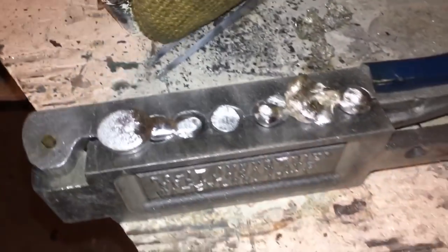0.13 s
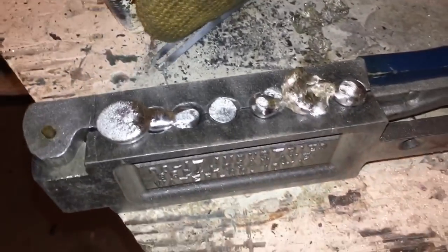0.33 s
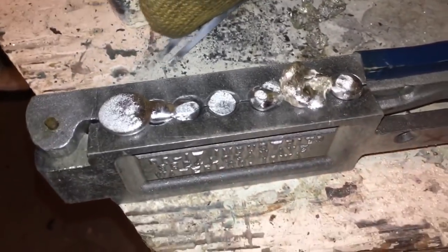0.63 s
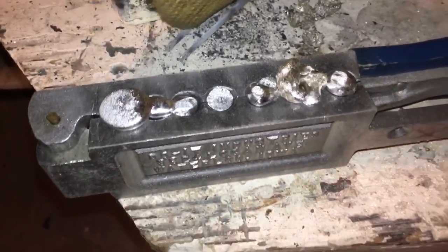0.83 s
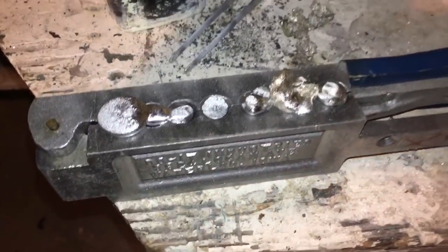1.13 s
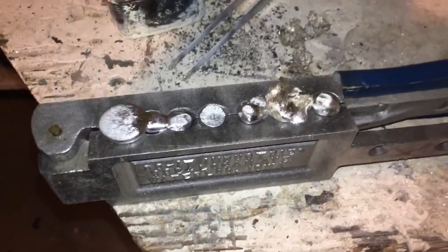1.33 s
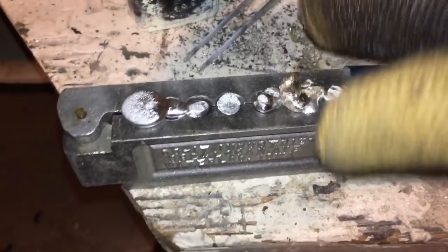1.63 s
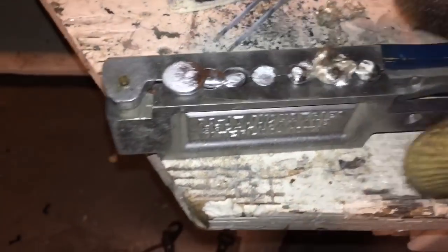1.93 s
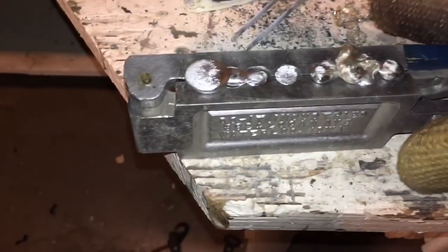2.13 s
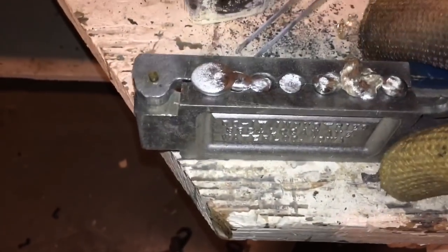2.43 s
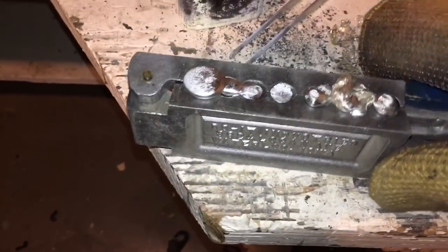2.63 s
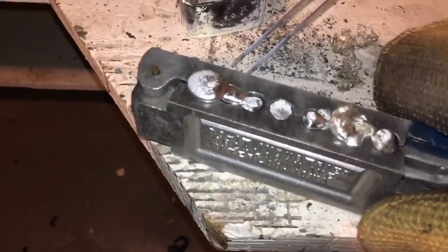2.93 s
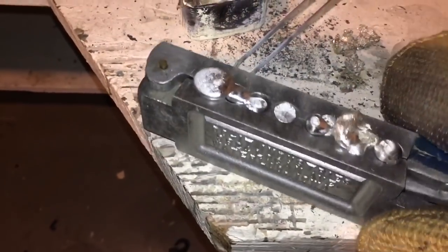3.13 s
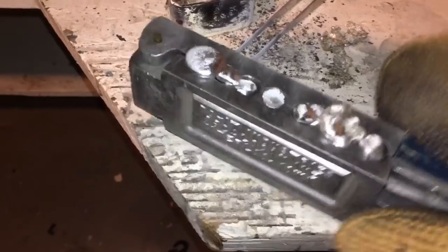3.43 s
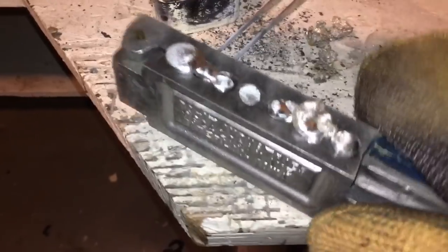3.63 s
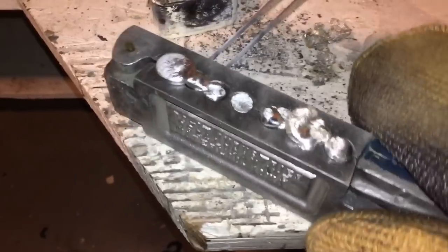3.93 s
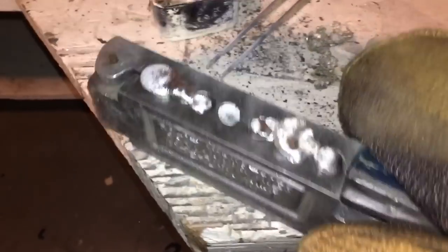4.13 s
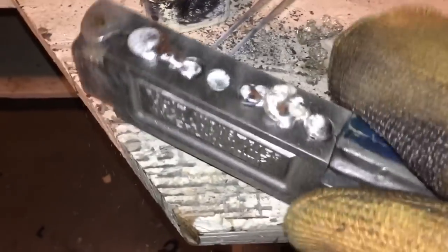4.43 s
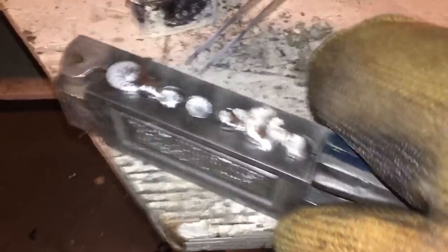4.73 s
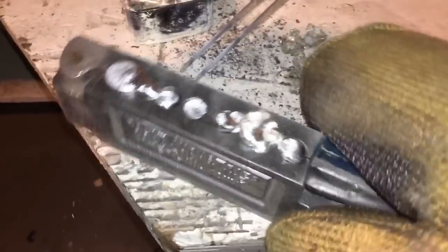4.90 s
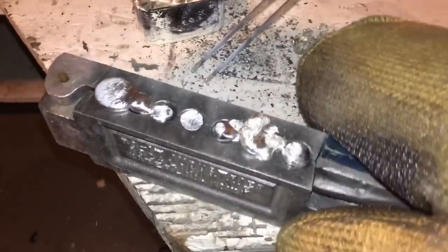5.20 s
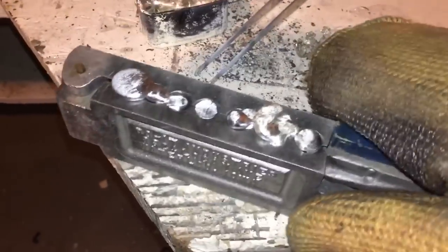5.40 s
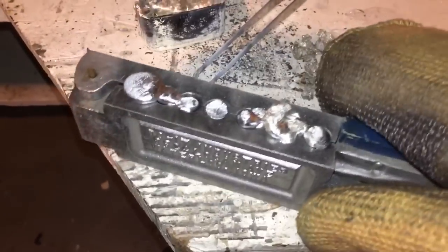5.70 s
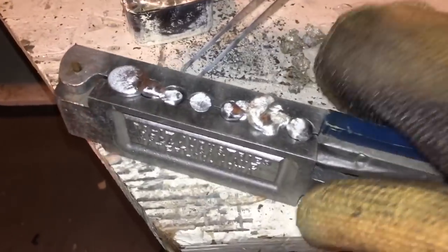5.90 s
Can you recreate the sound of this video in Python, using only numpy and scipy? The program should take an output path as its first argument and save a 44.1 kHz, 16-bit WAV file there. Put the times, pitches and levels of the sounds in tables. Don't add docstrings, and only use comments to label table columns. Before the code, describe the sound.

In a small shed, gloved hands shift a heavy steel mould on a wooden bench: two clear soft bumps, small ticks, rustle and gritty scraping. Then it is knocked hard on the boards about eleven times at an even, quick pace, each blow a woody boom with a steel crack and rattle. A few soft bumps follow as it is set down. Close phone microphone, faint hum and hiss.

```python
import sys
import numpy as np
from scipy import signal
from scipy.fft import rfft, irfft
from scipy.io import wavfile
from scipy.ndimage import uniform_filter1d, map_coordinates

SR = 44100
rng = np.random.default_rng(int(sys.argv[2]) if len(sys.argv) > 2 else 0)


def undo_db(level):
    steps = np.asarray(level, float) / 20
    return 10 ** steps


def waveform_to_disk(signal):
    frames = np.transpose(np.atleast_2d(signal))
    scaled = np.clip(frames, -1, 1) * 32767
    samples = np.round(scaled).astype(np.int16)
    wavfile.write(sys.argv[1], SR, samples)


N = 267157

# f/Hz, level/dB
HUM = [(60, -79), (120, -63.5), (180, -73.5), (240, -71), (360, -75), (480, -79)]
# f/Hz, level/dB
HISS = [(53, -10), (90, 5), (235, -12), (363, -23.5), (423, -38.5), (482, -11.5), (1080, -22),
        (2370, -19.5), (2640, -25.5), (15100, -36.5), (16500, -71.5)]
# t/s, length/s, drag on boards/dB, handling rumble/dB
SHIFTS = [(0, 0.16, -60, -47), (.25, 0.35, -68, -61), (.78, .1, -48, -51), (.87, 0.076, -57, -44.5),
          (1.02, 0.16, -78, -58), (1.34, 0.085, -70, -54.5), (1.47, 0.26, -74, -60),
          (1.73, 0.063, -62, -46.5), (1.88, .2, -63, -56), (2.15, 0.38, -56.5, -52),
          (2.58, 0.29, -52.5, -53.5), (2.85, 0.078, -44.5, -61), (2.97, 0.49, -58, -59),
          (3.2, 0.9, -52, -45.5), (5.3, 0.2, -41.5, -49), (5.52, 0.25, -44.5, -55),
          (5.82, 0.17, -55, -52.5)]
# t/s,
# length/s, rustle/dB, grit/dB
STROKES = [(0, 0.22, -66.5, -60.5), (.34, 0.075, -67.5, -60.5), (.46, 0.13, -70.5, -60.5),
           (.672, 0.12, -65, -53), (.905, 0.043, -67, -54), (1.075, 0.022, -75, -58),
           (1.17, 0.02, -70.5, -85), (1.5, 0.25, -71, -89), (1.8, .05, -67, -70), (1.9, 0.35, -72.5, -67.5),
           (2.22, 0.16, -66.5, -64.5), (2.42, 0.092, -64, -63), (2.53, 0.045, -62, -62),
           (2.6, 0.06, -58.5, -57.5), (2.72, 0.039, -63, -57), (2.69, 0.02, -56.5, -53.5),
           (2.8, 0.058, -58, -55.5), (2.95, 0.026, -65.5, -59), (3.02, 0.061, -66.5, -64),
           (3.15, .03, -74, -57.5), (3.2, 2.25, -67.5, -79), (5.37, 0.093, -63.5, -58.5),
           (5.46, 0.019, -60, -64), (5.52, .25, -62.5, -57.5), (5.58, 0.02, -55, -49.5),
           (5.89, 0.031, -60, -50)]
# f/Hz, level/dB
RUSTLE = [(710, -55), (1200, -3.5), (1990, -1.5), (2640, -11), (3330, -8), (10600, -17), (14800, -21),
          (16000, -37), (16500, -62)]
# t/s, level/dB, f/Hz, upper boards re bump/dB, low boards re bump/dB
BUMPS = [(0.038, -32.5, 180, -19, -8), (0.206, -16, 335.5, -15.5, -13.5), (0.446, -47, 404, -8, -19),
         (0.673, -34.5, 335, -10, -16), (0.762, -16, 346, -19, -0.5), (0.912, -36.5, 382, 1, -21),
         (1.074, -40.5, 346, -2, -33), (1.364, -38.5, 100, -15, -4), (1.484, -44, 236, -14, 1.5),
         (2.199, -40.5, 155, -7, 5), (2.793, -38, 310, -24, -19), (2.847, -32.5, 339, -8, 5.5),
         (5.384, -22.5, 297.4, -13, 0.5), (5.407, -26.5, 223, -14, -4), (5.467, -22.5, 310.7, -8.5, -9),
         (5.552, -34, 330, -8, -10), (5.59, -27.5, 337, -24, -13), (5.615, -26, 312, -7.5, -9),
         (5.667, -29.5, 311, -15, 0), (5.728, -37, 157, -4, 6), (5.817, -29, 116, -22, -1)]
# f/Hz, level/dB, time to fall 60 dB/s
BOARDS = [(126.4, -14.5, 0.19), (148.3, -2.5, 0.084), (176.6, -5.5, 0.18), (216.4, -3, 0.081),
          (265.7, 1.5, 0.047), (312, 4.5, 0.12), (365, 4, 0.026), (428, -22, 0.06), (469.6, -8.5, 0.04)]
# f/Hz, level/dB, time to fall 60 dB/s
UPPER_BOARDS = [(524.6, -5.5, 0.067), (595, 1, 0.081), (659, -1, 0.08), (681, -0.5, 0.038), (754, 4, 0.026),
                (828.2, 1.5, 0.087), (883, 3.5, 0.077), (957, -9.5, 0.13), (1034, 3, 0.028),
                (1334, -22, 0.074), (1315, -1.5, 0.012), (1490, -7, 0.066), (1648, -1, 0.016),
                (1858, -13.5, 0.027), (2117, -10, 0.031), (2250, -20, 0.034)]
# f/Hz, level/dB, time to fall 60 dB/s
SHED = [(60, -5.5, 0.63), (151, -5, 0.64), (335, 0, 0.4), (690, 0, 0.5), (1300, -8.5, 0.5),
        (2350, 1.5, 0.29), (6000, 3, 0.16), (14100, -9, 0.1)]
# t/s, level/dB, f/Hz, time to fall 60 dB/s
TICKS = [(.056, -54, 4370, 0.012), (.347, -55, 3140, 0.023), (.815, -63, 3520, 0.018),
         (.916, -39.5, 1620, 0.014), (1.091, -58, 6000, 0.009), (1.169, -68, 4000, .02),
         (1.369, -51.5, 2080, 0.027), (1.664, -48, 1335, 0.029), (1.664, -50, 2920, 0.019),
         (1.69, -61, 3040, .03), (1.711, -52.5, 1640, 0.033), (1.82, -63, 3360, 0.052),
         (2.562, -53, 5000, 0.022), (2.588, -44, 1700, 0.0096), (2.8, -52.5, 820, 0.49),
         (2.85, -47, 800, 0.12), (2.96, -59, 1700, 0.034), (5.457, -44, 1170, 0.028),
         (5.881, -50, 1724, 0.023), (5.895, -44.5, 1723, 0.096), (0.666, -47.5, 1300, 0.073),
         (.447, -53, 870, 0.028)]
# t/s, level/dB, long ring re clap/dB
CLAPS = [(3.178, -26, -15), (3.186, -33, -26), (3.262, -39, -15), (3.374, -29, -27), (3.3777, -25, -40),
         (3.386, -30.5, -23), (3.5743, -22.5, -16), (3.589, -37, -9), (3.755, -20.5, -28),
         (3.7781, -22, -17), (3.968, -15, -41), (3.9755, -26.5, -8), (4.177, -29.5, -32),
         (4.1832, -10.5, -27), (4.201, -24.5, -12.5), (4.2353, -42, -32), (4.3898, -8, -28),
         (4.596, -13.5, -39), (4.6015, -17.5, -15), (4.6093, -18.5, -7.5), (4.6254, -15.5, -20),
         (4.7566, -44, -28), (4.7958, -20.5, -27), (4.825, -29, -37.5), (4.9923, -20.5, -24),
         (5.18, -25.5, -27), (5.195, -28, -20), (5.253, -36, -32), (5.3852, -44, -23)]
# f/Hz, level/dB, time to fall 60 dB/s
STEEL = [(4370, -1, 0.0038), (5404, -6.5, 0.017), (6000, -2.5, 0.0088), (7260, -3.5, 0.0044),
         (8480, -9.5, 0.012), (9130, -14, 0.0089), (12900, -17, .008), (14100, -9.5, .008)]
# f/Hz, level/dB, time to fall 60 dB/s
LONG_RING = [(11100, -7.5, 0.045), (11300, -12, 0.04)]
# t/s, boards level/dB, legs re boards/dB, upper re low boards/dB, delay of full weight/ms
BLOWS = [(3.179, -10, -46, -2, 0.17), (3.379, -9, -17.5, 3.5, 0.31), (3.571, -8, -10, -9.5, 5.87),
         (3.757, -7.5, -12, -8, 5.7), (3.965, -6.5, -7.5, -4.5, 4.03), (4.178, -5, -20, 2.5, 5.6),
         (4.389, -6.5, -8, 7, 3.4), (4.594, -5, -12.5, 4.5, 4.67), (4.790, -5.5, -15, -8, 5),
         (4.99, -6, -12, -2.5, 3.93), (5.181, -5, -46, -8, 2.38), (5.254, -17, -7.5, -0.5, 1.6)]
# f/Hz, level/dB, time to fall 60 dB/s
LEGS = [(72.7, 16.5, 0.24), (82, -22, .2), (114, -2.5, 0.45)]


def unit(x):
    return x / np.sqrt(np.mean(x ** 2))


def band(x, lo_hz, hi_hz):
    return signal.sosfilt(signal.butter(2, [lo_hz, hi_hz], "band", fs=SR, output="sos"), x)


def colour(x, points):
    hz, db = np.transpose(points)
    bin_hz = np.arange(N // 2 + 1) * SR / N
    gain = undo_db(np.interp(np.log(bin_hz + 1), np.log(hz), db))
    return unit(irfft(rfft(x) * gain, N))


def walk(rate_hz):
    hold = int(SR / rate_hz)
    steps = np.repeat(rng.standard_normal(N // hold + 1), hold)
    smooth = uniform_filter1d(uniform_filter1d(steps, hold), hold)
    return unit(smooth[:N])


def grains(rate_hz, spread_db):
    hits = rng.random(N) < rate_hz / SR
    return hits * rng.standard_normal(N) * undo_db(spread_db * rng.exponential(size=N))


def ring(modes, scatter_db, detune, twin=0.):
    hz, db, t60 = np.transpose(modes)[:, :, None]
    shift, weight, split = rng.standard_normal((3, len(modes), 1))
    t = np.arange(int(SR * min(t60.max(), .3))) / SR
    phase = 2 * np.pi * hz * (1 + detune * shift) * t
    gain = undo_db(db + scatter_db * weight)
    tone = np.sin(phase) + twin * np.sin(phase * (1 + 0.046 * split))
    y = np.sign(shift) * gain * undo_db(-60 * t / t60) * tone
    return y.sum(axis=0) / np.sqrt(2 * (1 + twin ** 2) * np.sum(gain ** 2))


def add(out, s, x):
    i = int(s * SR)
    out[i:i + len(x)] += x[:N - i]


def workshop():
    t = np.arange(N) / SR
    hum = sum(undo_db(db + 4.5 + 3.0 * walk(1.3)) * np.sin(2 * np.pi * hz * t) for hz, db in HUM)
    hiss = colour(rng.standard_normal(N), HISS)
    return hum + hiss * undo_db(-62 + 1.2 * walk(2.5))


def movements(rows, rest_db):
    onset_s, fade_s = 0.016, 0.042
    t = np.arange(N) / SR
    power = np.ones((2, N)) * undo_db(2 * rest_db)
    for s, length, *db in rows:
        edge_db = -10 * (np.maximum(s - t, 0) / onset_s + np.maximum(t - s - length, 0) / fade_s)
        power += undo_db(2 * (np.array(db)[:, None] + np.maximum(edge_db, -90)))
    return 10 * np.log10(power)


def hands():
    drag_db, rumble_db = movements(SHIFTS, rest_db=-70)
    rustle_db, grit_db = movements(STROKES, rest_db=-82)
    rumble = unit(band(rng.standard_normal(N), 37.5, 60.8)) * undo_db(rumble_db + 2.5 + 2.0 * walk(20))
    slips = rng.standard_normal(N) + 2.5 * grains(500, spread_db=1.2)
    drag = unit(band(slips, 120, 312)) * undo_db(drag_db + 2.2 * walk(25))
    grit = unit(band(slips, 587, 1440)) * undo_db(grit_db + 2 * walk(30))
    weave = rng.standard_normal(N) + 3.5 * grains(900, spread_db=1.6)
    rustle = colour(weave, RUSTLE) * undo_db(rustle_db + 2.5 + 2 * walk(45))
    return rumble + drag + grit + rustle


def bumps():
    out, push = np.zeros(N), np.hanning(int(0.0013 * SR))
    t60_s = 0.11
    for s, db, hz, upper_db, boards_db in BUMPS:
        tones = [(hz, 0, t60_s), (1.07 * hz, -10, t60_s), (1.5 * hz, -7, .05), (hz, -30, .2)]
        low = ring(tones, scatter_db=1.5, detune=.003, twin=.15)
        boards = ring(BOARDS[:4], scatter_db=3.0, detune=.03)
        low = low + undo_db(boards_db) * np.resize(np.r_[boards, 0 * low], len(low))
        add(out, s, undo_db(db - 0.5) * np.convolve(low, push / push.sum()))
        upper = ring(UPPER_BOARDS, scatter_db=1.0, detune=0.0097, twin=1.0)
        add(out, s, undo_db(db + upper_db - 1.0) * upper)
    return out


def shed(x, early_db, late_db, early_s):
    t = np.arange(SR // 2) / SR
    hz, db, t60 = np.transpose(SHED)
    tail = 0
    for centre in 45 * 2 ** np.arange(0, 8.6, .5):
        echo_db, decay_s = (np.interp(np.log(centre), np.log(hz), c) for c in (db, t60))
        echoes = band(rng.standard_normal(len(t)), centre / 2 ** .25, centre * 2 ** .25)
        even = np.sqrt(np.mean(echoes ** 2) / uniform_filter1d(echoes ** 2, int(9 * SR / centre)))
        tail = tail + echoes * even * undo_db(echo_db - 60 * t / decay_s)
    near = undo_db(early_db) / (1 + np.exp((t - early_s) / 0.012))
    tail = tail * (undo_db(late_db) + near) * np.minimum(t / 0.0022, 1) / np.sqrt(SR)
    sway = walk(30)
    paths = np.arange(N) + sway * .00022 * SR
    return map_coordinates(signal.fftconvolve(x, tail), [paths], mode="nearest") * undo_db(0.91 * sway)


def ticks():
    out = np.zeros(N)
    for s, db, hz, t60 in TICKS:
        tones = [(hz, 0, t60), (.72 * hz, -7, .012), (min(1.187 * hz, SR / 3), -7, .01)]
        add(out, s, undo_db(db + 7) * ring(tones, scatter_db=2.0, detune=.004))
        click = band(rng.standard_normal(400), 1500, 9400) * undo_db(-np.arange(400) / 1.4)
        add(out, s, undo_db(db + 0.5) * click)
    return out


def claps():
    out, t = np.zeros(N), np.arange(SR // 100) / SR
    touches = [(row[0], row[1] - 23.5, -25) for row in BLOWS]
    for s, db, ring_db in list(CLAPS) + touches:
        burst = rng.standard_normal(len(t)) * undo_db(-60 * t / .007)
        steel = signal.fftconvolve(burst, ring(STEEL, scatter_db=2.5, detune=.03))
        add(out, s, undo_db(db - 6.0) * steel / np.abs(steel).max())
        add(out, s, undo_db(db - 10.5) * band(burst, 2500, 10100))
        add(out, s, undo_db(db + ring_db - 1.0) * ring(LONG_RING, scatter_db=4.5, detune=0.0026))
    return out


def rocking(t, settle_s, rock_db):
    pats = rng.standard_normal(len(t)) * (rng.random(len(t)) < 400 / SR) * (t < settle_s)
    soft = np.convolve(pats * undo_db(-60 * t / .25), np.hanning(18) / 8)[:len(t)]
    return np.r_[1, undo_db(rock_db) * soft[1:]]


def blows():
    out, t = np.zeros(N), np.arange(SR // 6) / SR
    for s, db, legs_db, upper_db, later_ms in BLOWS:
        full = s + later_ms / 1000
        top_db = db + upper_db
        rock = rocking(t, settle_s=.048, rock_db=-11.5)
        boards = [ring(BOARDS, scatter_db=2.0, detune=.012, twin=.6) for _ in range(2)]
        upper = [ring(UPPER_BOARDS, scatter_db=2.0, detune=.012, twin=.8) for _ in range(2)]
        add(out, s, undo_db(db - 3.0) * boards[0])
        add(out, s, undo_db(top_db - 8.0) * upper[0])
        add(out, s, undo_db(db + legs_db + 2.0) * ring(LEGS, scatter_db=-2.0, detune=0.034))
        add(out, full, undo_db(db + 1.5) * signal.fftconvolve(rock, boards[1]))
        add(out, full, undo_db(top_db + 1.0) * signal.fftconvolve(rock, upper[1]))
        noise = rng.standard_normal(len(t))
        clack = unit(band(noise, 1000, 1740)) * undo_db(-60 * t / 0.026)
        add(out, full, undo_db(top_db - 11.0) * clack)
        crunch = unit(band(noise, 1600, 2090)) * undo_db(-60 * t / 0.037)
        add(out, full, undo_db(top_db - 23) * crunch)
        thud = unit(band(rng.standard_normal(len(t)), 603, 1045))
        add(out, full, undo_db(top_db - 7.5) * thud * undo_db(-60 * t / 0.12) * np.minimum(t / 0.006, 1))
        body = unit(band(rng.standard_normal(len(t)), 175, 469))
        add(out, full, undo_db(db - 4.5) * body * undo_db(-60 * t / 0.15) * np.minimum(t / .003, 1))
        chatter_db = db - 31.5 + 0.61 * upper_db
        chatter = unit(band(noise ** 3, 2200, 14500))
        add(out, s, undo_db(chatter_db) * chatter * undo_db(-60 * t / 0.11) * np.minimum(t / 0.016, 1))
    return out


def scene():
    soft, hard = bumps() + ticks(), claps() + blows()
    echoes = shed(hard + undo_db(1.5) * soft, early_db=4.5, late_db=6, early_s=0.0097)
    return (hard + soft + echoes + hands() + workshop())[None]


def band_limit(x):
    return signal.sosfilt(signal.butter(12, 16810, fs=SR, output="sos"), x)


def record(dry):
    x = signal.sosfilt(signal.butter(3, 50, "high", fs=SR, output="sos"), dry)
    x = np.clip(np.tanh(0.78 * x) / 0.81, -1, 1)
    x = signal.sosfilt(signal.butter(14, 16300, fs=SR, output="sos"), x)
    return band_limit(x)


dry = scene()
out = record(dry)
waveform_to_disk(out)
```